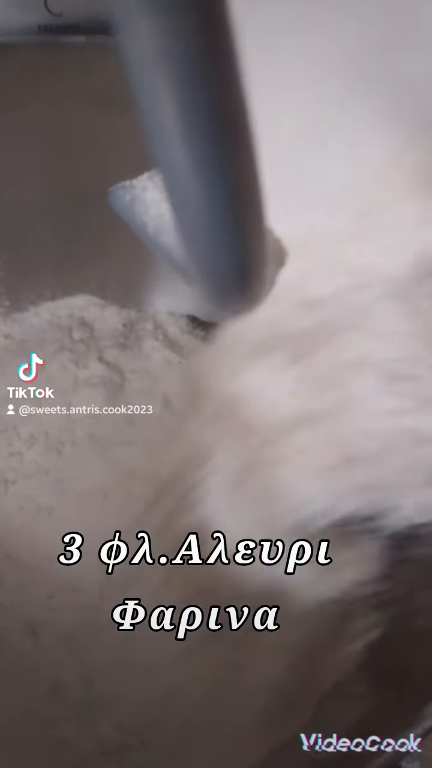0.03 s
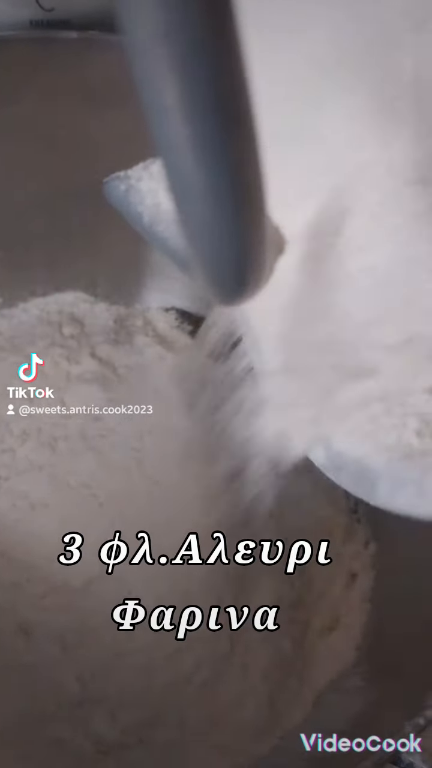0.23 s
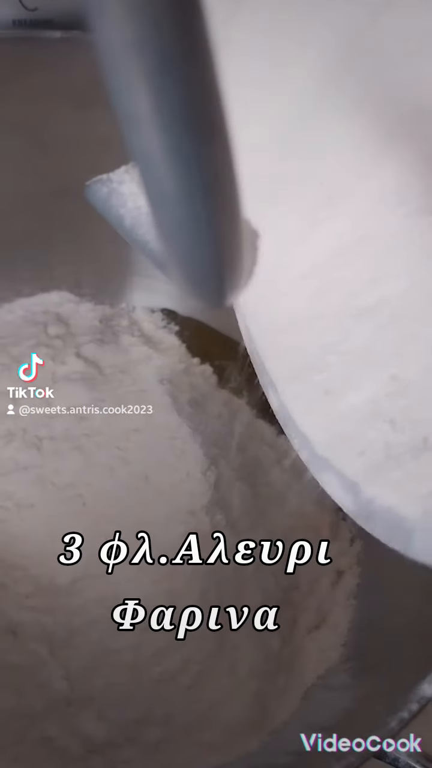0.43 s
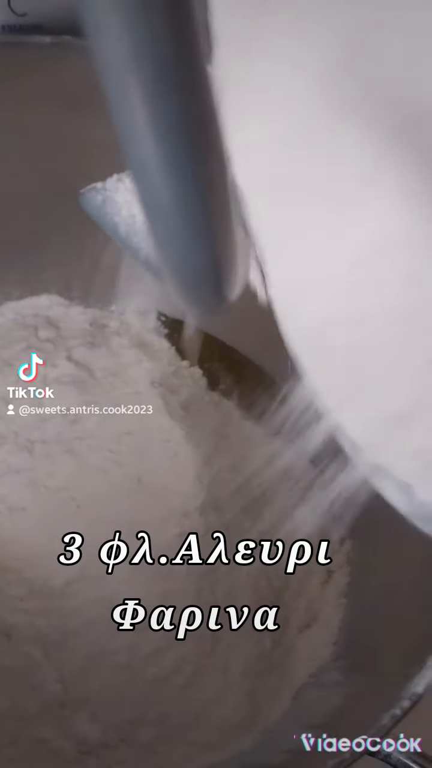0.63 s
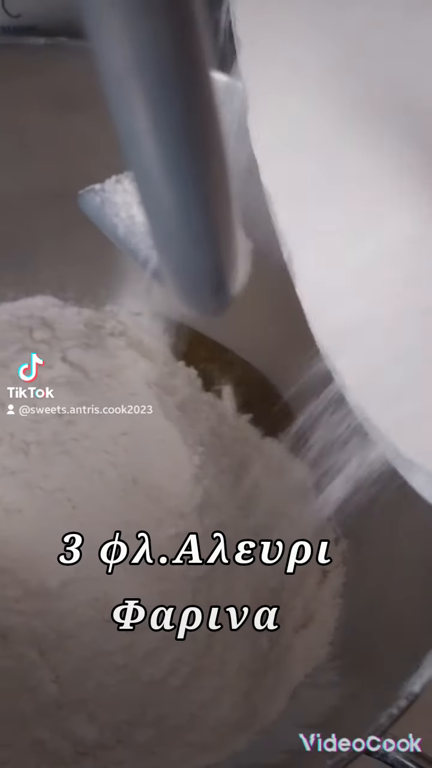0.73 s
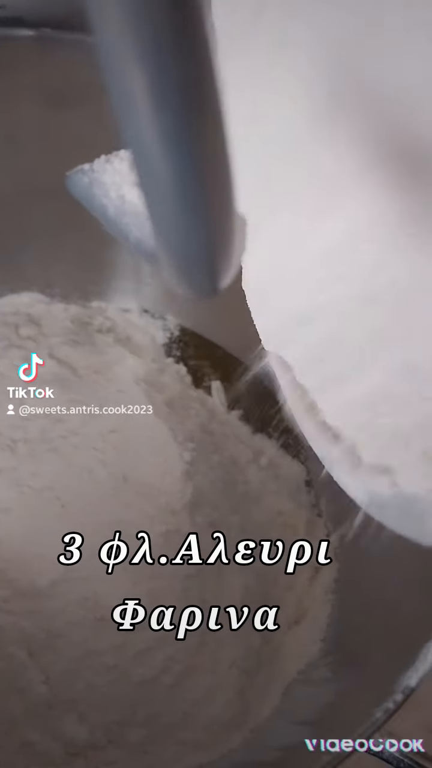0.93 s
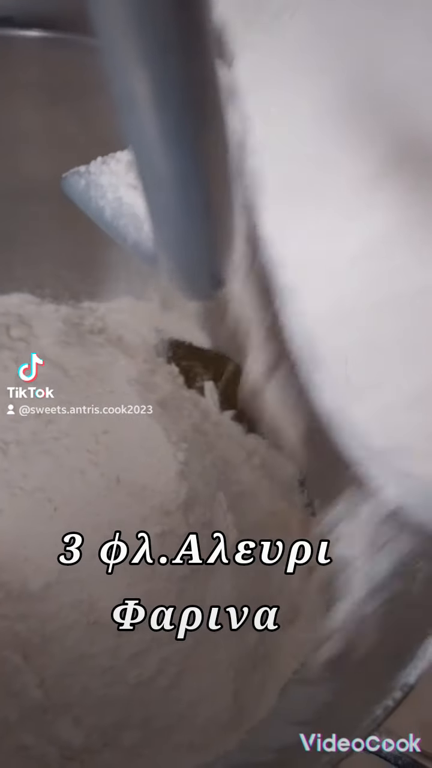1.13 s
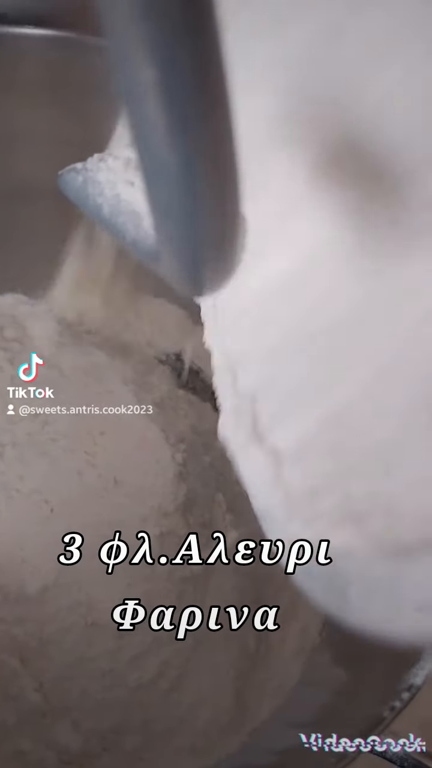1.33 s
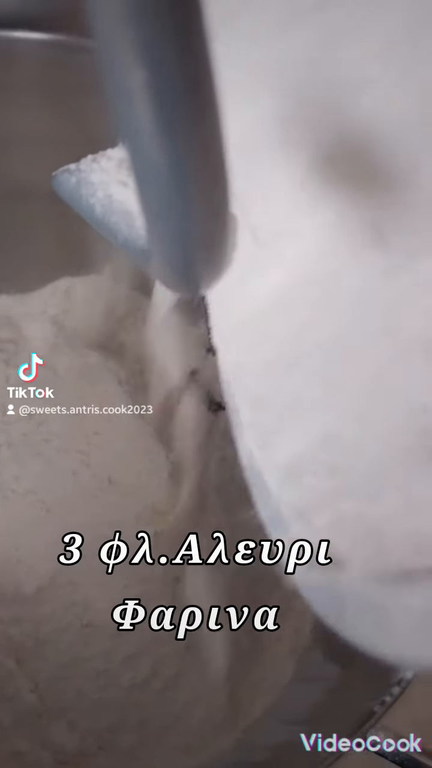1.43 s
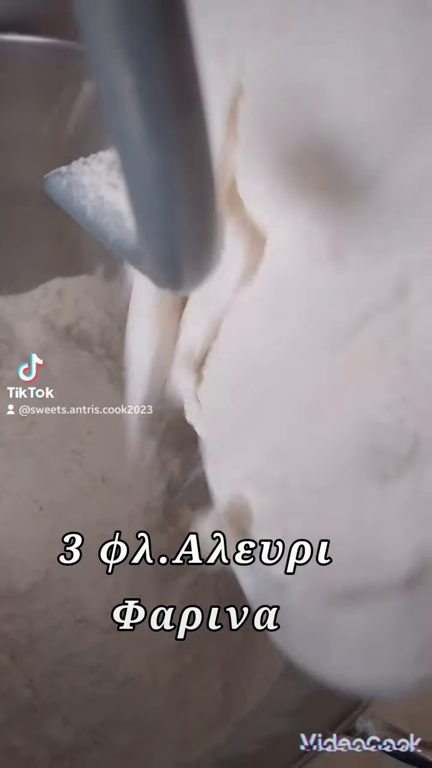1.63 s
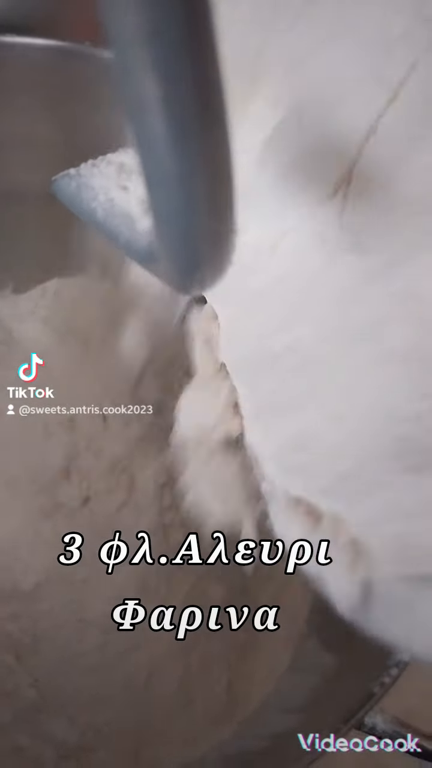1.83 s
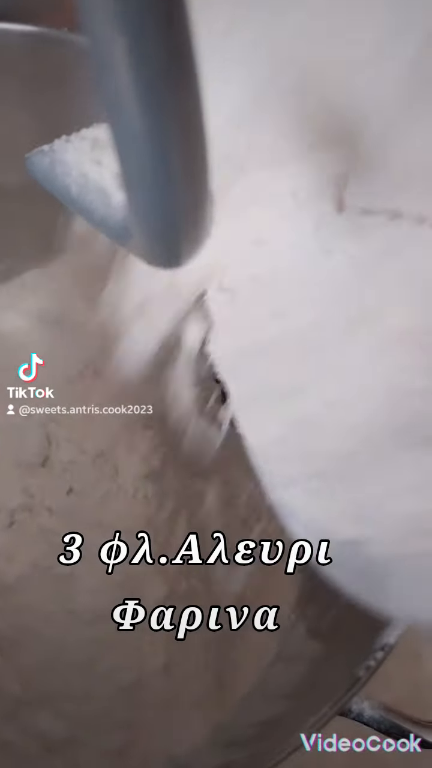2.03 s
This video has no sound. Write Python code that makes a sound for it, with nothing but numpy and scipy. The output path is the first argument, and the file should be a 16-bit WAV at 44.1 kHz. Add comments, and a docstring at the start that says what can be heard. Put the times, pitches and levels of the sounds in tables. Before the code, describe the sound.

A plastic container knocks close by against a metal mixing bowl. A sharp tap at 0.2 seconds leads into hollow knocks that fade by 0.7 seconds. More thudding taps land around 0.8, 1.15, 1.35 and 1.5 seconds, with a tiny knock near 2 seconds. Flour slides out in soft puffs between them, while very faint birdlike chirps sound over the quiet kitchen's low hum.

```python
"""A plastic container knocks against a metal mixing bowl as it is emptied, close by in a quiet kitchen.
Each impact excites damped modes: the flour-damped bowl answers with a hollow note and a tick, and taps
that loosen the rest draw a thud, a ring and a crack from the container. Flour slides out in soft puffs
of grainy noise. Faint falling chirps, like a distant bird, sound over the low room noise and hum."""
import sys
import numpy as np
from scipy import signal
from scipy.fft import rfft, irfft
from scipy.io import wavfile
from scipy.ndimage import uniform_filter1d

SR = 44100
rng = np.random.default_rng(int(sys.argv[2]) if len(sys.argv) > 2 else 0)


def dump_mix(stems):
    """Bounce the given channels to the path in sys.argv[1] as a 16-bit WAV at rate SR."""
    frames = np.atleast_2d(stems).T  # one column per channel
    limited = np.clip(frames, -1, 1)  # hard clip at full scale
    pcm = np.round(limited * 32767).astype(np.int16)
    wavfile.write(sys.argv[1], SR, pcm)


N = 92610
LEAD_S = 0.1  # lead-in, so that an earlier blow can still be ringing at time zero


def amp(db):
    """Amplitude ratio: a factor of ten per 20 dB."""
    return 10 ** (np.asarray(db) / 20)


def unit_rms(x):
    """Normalisation to unit mean power."""
    return x / np.sqrt(np.mean(x ** 2) + 1e-20)


def curve_at(points, hz):
    """Interpolation on a logarithmic frequency axis."""
    point_hz, value = np.transpose(points)
    return np.interp(np.log(hz + 1), np.log(point_hz + 1), value)


def track():
    """Stereo silence with a lead-in."""
    return np.zeros((2, N + round(LEAD_S * SR)))


def add(mix, start_s, sound):
    """Superposition: a sound sums into a track from its start time."""
    part = mix[..., max(round((start_s + LEAD_S) * SR), 0):][..., :sound.shape[-1]]
    part += sound[..., :part.shape[-1]]


def pan(pan_db):
    """Level difference between the channels: left exceeds right by pan_db."""
    return amp(np.array([[pan_db], [-pan_db]]) / 2)


def decay(t, t60_s):
    """Exponential damping: 60 dB of loss in t60_s."""
    return np.exp(-np.log(1000) * t / t60_s)


def ring(modes, rise_s, hold_s=0):
    """Modal vibration: damped cosines start together and decay after hold_s."""
    t = np.arange(SR // 2) / SR
    free_s = np.maximum(t - hold_s, 0)
    motion = sum(pan(pan_db) * amp(level_db) * decay(free_s, t60_s) * np.cos(2 * np.pi * pitch_hz * t)
                 for pitch_hz, level_db, t60_s, pan_db in modes)
    return -(1 - np.exp(-t / rise_s)) * motion


def strike(body, contact_ms, edge, lag_ms):
    """Impact as a low-pass: longer contact dulls the body, not the edge. Both reach the right late."""
    jw = 2j * np.pi * np.fft.rfftfreq(body.shape[1], 1000 / SR)  # radians per ms
    spectrum = rfft(body) / (1 + jw * contact_ms) ** 3 + rfft(edge)
    delay = np.array([np.ones_like(jw), np.exp(-jw * lag_ms)])
    return irfft(spectrum * delay)


# Left-right coherence of the room's sound field: frequency_hz, coherence
FIELD_COHERENCE = [(60, 0.84), (290, 1), (640, 0.19), (1400, 0), (15000, 0.078)]
# Left-right balance of diffuse noise: frequency_hz, pan_db
FIELD_BALANCE = [(60, -3.5), (200, 1), (380, -1.5), (750, -9), (1300, -4.5), (2400, 2.5), (15000, 3)]


def noise(spectrum, size, diffuse=False):
    """Spectrally shaped stereo noise; a diffuse field is coherent only at long wavelengths."""
    hz = np.fft.rfftfreq(size, 1 / SR)
    bins = rfft(rng.standard_normal((2, size))) * amp(curve_at(spectrum, hz))
    if diffuse:
        coherence = np.clip(curve_at(FIELD_COHERENCE, hz), -1, 1)
        balance = amp(curve_at(FIELD_BALANCE, hz) / 2)
        right = coherence * bins[0] + np.sqrt(1 - coherence ** 2) * bins[1]
        bins = np.array([bins[0] * balance, right / balance])
    return unit_rms(irfft(bins, size))


# Spectrum of the room's background noise: frequency_hz, level_db
ROOM_NOISE_SPECTRUM = [(20, -23.5), (42, -8.5), (63, -4.5), (100, -6), (200, -12), (400, -16.5), (680, -29),
                       (850, -12.5), (1000, -26), (1600, -24.5), (2500, -45.5), (4500, -38), (9000, -52.5),
                       (16000, -44.5)]


def room_noise(level_db=-64.5):
    """A steady diffuse field, strongest in the bass."""
    return amp(level_db) * noise(ROOM_NOISE_SPECTRUM, N, diffuse=True)


def hum(pitch_hz=68, width_hz=8.3, level_db=-67.5):
    """Narrow-band noise: neighbouring frequencies beat, so the room's hum wavers."""
    hz = np.fft.rfftfreq(N, 1 / SR)
    band = np.exp(-((hz - pitch_hz) / width_hz) ** 2)
    return amp(level_db) * unit_rms(irfft(rfft(rng.standard_normal(N)) * band, N))


def echoes(t60_s, gap_s=0):
    """Dense reflections: an impulse response of decaying noise with unit energy."""
    t = np.arange(SR // 2) / SR
    response = rng.standard_normal((2, len(t))) * decay(t, t60_s) * (t > gap_s)
    return response / np.linalg.norm(response, axis=1, keepdims=True)


# Reverberation of the kitchen: frequency_hz, t60_s, level_db
REVERB_BANDS = [(71, 0.2, 4), (170, 0.36, -10), (270, 0.32, -4.5), (403, 0.19, -10.5), (938, 0.58, -22),
                (2200, 0.16, -8.5), (5000, 0.5, -13.5), (7500, 0.39, -16), (10000, .44, -21),
                (15600, .36, -10)]


def kitchen(direct, early_db=-14, build_up_s=0.0079):
    """Reverberation: early reflections in the bowl, then a room tail with a decay time for each band."""
    hz, t, bins = signal.stft(rng.standard_normal((2, SR)), SR, nperseg=512)
    bands = np.array(REVERB_BANDS)
    t60_s = curve_at(bands[:, [0, 1]], hz)[:, None]
    level_db = curve_at(bands[:, [0, 2]], hz)[:, None]
    coherence = np.clip(curve_at(FIELD_COHERENCE, hz), -1, 1)[:, None]
    bins[1] = coherence * bins[0] + np.sqrt(1 - coherence ** 2) * bins[1]
    unit_energy_decay = decay(t, t60_s) * np.sqrt(2 * np.log(1000) / t60_s / SR)
    tail = signal.istft(bins * amp(level_db) * unit_energy_decay, SR, nperseg=512)[1][:, :SR]
    tail *= np.minimum(np.arange(SR) / SR / build_up_s, 1) ** 2
    early = amp(early_db) * echoes(t60_s=0.082, gap_s=0.007)
    return direct + sum(signal.fftconvolve(direct, response, axes=1)[:, :direct.shape[1]]
                        for response in (early, tail))


# Distant chirps: start_s, length_s, start_hz, end_hz, level_db
CHIRP_NOTES = [(.07, 0.13, 5380, 4910, -84), (0.219, 0.045, 3935, 3090, -70.5),
               (0.298, 0.066, 4650, 2890, -69.5), (0.429, .08, 3940, 3800, -76.5),
               (0.9, 0.09, 4160, 3336, -73.5), (0.998, 0.09, 4144, 3046, -73.5),
               (1.62, 0.083, 4450, 3150, -72.5), (1.719, 0.067, 4317, 2840, -71),
               (1.955, 0.049, 4460, 3560, -79)]


def chirps(warble_depth=0.045, warble_s=0.004, direct_gain=0.42):
    """Frequency modulation: falling tones with a random warble, blurred by reverberation."""
    out = track()
    for start_s, length_s, start_hz, end_hz, level_db in CHIRP_NOTES:
        progress = np.linspace(0, 1, round(length_s * SR))
        warble = unit_rms(uniform_filter1d(rng.standard_normal(SR), round(warble_s * SR)))
        glide_hz = start_hz + (end_hz - start_hz) * progress
        pitch_hz = glide_hz * (1 + warble_depth * warble[:len(progress)])
        envelope = np.sqrt(abs(np.sin(np.pi * progress)))
        tone = np.sin(2 * np.pi * np.cumsum(pitch_hz) / SR)
        add(out, start_s, amp(level_db) * unit_rms(envelope * tone))
    reverb = signal.fftconvolve(out, echoes(t60_s=0.38), axes=1)[:, :out.shape[1]]
    return direct_gain * out + reverb


# Envelope of the container's rustle: time_s, level_db
RUSTLE_ENVELOPE = [(0, -57), (.17, -63.5), (.3, -59), (.6, -60.5), (.85, -56.5), (1.05, -60.5),
                   (1.3, -59.5), (1.55, -60), (1.7, -67.5), (2.1, -70)]
# Spectrum of the rustle: frequency_hz, level_db
RUSTLE_SPECTRUM = [(35, -21.5), (100, -2.5), (230, -1), (420, -3.5), (700, -8), (1000, -5.5), (1600, -12.5),
                   (2500, -26), (7000, -34.5), (16000, -58.5)]


def rustle():
    """Amplitude modulation: the dull noise of the handled container swells and sinks."""
    level_db = np.interp(np.arange(N) / SR, *np.transpose(RUSTLE_ENVELOPE))
    return amp(level_db) * noise(RUSTLE_SPECTRUM, N, diffuse=True)


# Flour leaving the container: peak_s, half_length_s, level_db
FLOUR_PUFFS = [(.33, 0.031, -74.5), (.51, 0.08, -79.5), (.74, 0.051, -85), (.88, 0.041, -74.5),
               (1.12, 0.022, -75), (1.27, 0.038, -72), (1.43, 0.049, -76.5), (1.58, 0.041, -71.5),
               (1.75, 0.036, -77), (2.11, .04, -93)]
# Spectrum of sliding powder: frequency_hz, level_db
POWDER_SPECTRUM = [(1500, 1.5), (4000, -6), (7500, -2), (9000, -7.5), (13000, -4), (16000, -7.5)]


def flour(grain_depth=0.13):
    """Granular flow: hiss in bell-shaped puffs, roughened by a fast random flicker."""
    t = np.arange(N) / SR
    flow = sum(amp(level_db) * np.exp(-((t - peak_s) / half_length_s) ** 2 / 2)
               for peak_s, half_length_s, level_db in FLOUR_PUFFS)
    flicker = unit_rms(uniform_filter1d(rng.standard_normal(N), size=60))
    grains = unit_rms(np.exp(grain_depth * flicker))
    return flow * grains * noise(POWDER_SPECTRUM, N)


def centred(table, centre_hz, first_octave_db=2.28):
    """Band-pass weighting: levels fall with the square of the octaves from a centre."""
    return [(hz, db - first_octave_db * np.log2(hz / centre_hz) ** 2, *rest) for hz, db, *rest in table]


# Taps on the container: start_s, thud_db, thud_hz, ring_db, tilt_db_per_octave, contact_ms,
# crack_db, crack_hz, pan_db
CONTAINER_TAPS = [(-.028, -12.5, 225, -23, -2.5, 0.14, -33, 5070, 4.5),
                  (0.2057, -7, 401, -22, 2, 0.17, -50, 4500, 4.5),
                  (0.2138, -15, 496, -38.5, 1, 0.21, -51.5, 4850, 0),
                  (0.8147, -15.5, 415, -27, 4.5, 0.059, -31.5, 1200, 0.5),
                  (1.15, -12.5, 306, -31.5, 1.5, 0.052, -31.5, 7560, 4),
                  (1.3510, -14, 195, -20.5, 1, 0.2, -37, 4260, 7),
                  (1.4704, -14.5, 198, -21.5, 0.7, 0.18, -36.5, 4600, 5.5)]
# Modes of the container wall, plus two low room resonances that ring on after each tap:
# pitch_hz, level_db, t60_s, pan_db
WALL_AND_ROOM_MODES = [(119.5, -12.5, 0.11, -5.5), (223.9, -21.5, 0.34, -12.5), (279.4, -15.5, 0.43, -5),
                       (335.2, -5, 0.06, -8.5), (475.3, -7.5, 0.08, 5.5), (530, -13, 0.038, 9),
                       (768.6, 3, 0.058, 2.5), (810, -12, .045, 4.5), (935, -20.5, 0.047, 4),
                       (1204, 3.5, 0.019, -3.5), (1760, -14.5, 0.023, 7), (2610, -23.5, .035, 17)]
# Modes of the stiff rim: pitch_hz, level_db, t60_s, pan_db
RIM_RESONANCES = [(3500, -32.5, 0.01, 2.5), (4680, -17.5, 0.014, -4), (7590, -6, .03, 1.5),
                  (7270, -5, 0.013, 13.5), (7640, -26, .028, 5.5)]
# Spectrum of the plastic crack: frequency_hz, level_db
CRACK_SPECTRUM = [(600, 16), (1200, 3.5), (2250, -5.5), (2900, -2.5), (3700, -1), (5000, 0.5), (6700, -5.5),
                  (7800, -1.5), (9200, -8.5), (13000, -11.5), (16000, -22)]


def taps(pivot_hz=470, crack_hold_s=0.0025):
    """Impulse response: a thud pitched by where the tap lands, a crack, and wall, rim and room modes."""
    out, t = track(), np.arange(SR // 2) / SR
    crack_envelope = decay(np.maximum(t - crack_hold_s, 0), t60_s=0.015)
    for start_s, thud_db, thud_hz, ring_db, tilt, contact_ms, crack_db, crack_hz, pan_db in CONTAINER_TAPS:
        thud = ring([(thud_hz, thud_db, 0.023, 0)], rise_s=0.00034)  # one mode, t60 of 23 ms
        modes = [(hz, ring_db + db + tilt * np.log2(hz / pivot_hz), *rest)
                 for hz, db, *rest in WALL_AND_ROOM_MODES]
        body = pan(pan_db) * (thud + ring(modes, rise_s=0.00065))
        crack = noise(centred(CRACK_SPECTRUM, crack_hz), len(t)) * crack_envelope
        rim = ring(centred(RIM_RESONANCES, crack_hz), rise_s=0.0007)
        edge = amp(crack_db) * pan(4.5) * (crack + rim)
        add(out, start_s, strike(body, contact_ms, edge, lag_ms=0.5))
    return out


# Knocks of the container on the bowl: start_s, level_db, contact_ms, tick_db
BOWL_KNOCKS = [(0.2899, -23.5, 0.28, -56.5), (0.4238, -21.5, 0.08, -42), (0.5567, -29, 0.15, -49),
               (0.671, -44, 0.25, -61.5), (1.966, -51, 0.13, -74.5)]
# Modes of container and bowl in contact: pitch_hz, level_db, t60_s, pan_db
BOWL_RESONANCES = [(104, -24.5, 0.3, 1), (222, -7.5, 0.045, -2.5), (422.5, 0, 0.054, -1),
                   (686, 0.5, 0.047, 0), (974, 1, 0.037, -5.5), (1667, -15, 0.11, 17.5),
                   (2070, -20, 0.015, -14), (218.2, -33, 0.87, -3.5)]
# Spectrum of the metal tick: frequency_hz, level_db
TICK_SPECTRUM = [(1500, 19), (2700, -6), (4000, -10.5), (5900, 3), (6600, -9), (7400, 5.5), (8800, -13),
                 (16000, -18)]


def knocks():
    """Impact excitation: container and bowl ring together in a hollow note, with a faint metal tick."""
    out, t = track(), np.arange(SR // 2) / SR
    note = ring(BOWL_RESONANCES, rise_s=0.0006, hold_s=0.004)
    for start_s, level_db, contact_ms, tick_db in BOWL_KNOCKS:
        tick = amp(tick_db) * noise(TICK_SPECTRUM, len(t)) * decay(t, t60_s=0.07)
        add(out, start_s, strike(amp(level_db) * note, contact_ms, tick, lag_ms=0.27))
    return out


def scene(low_cut_hz=81):
    """Superposition: reverberant blows, thinned by a microphone-style low cut, over quieter sources."""
    low_cut = signal.butter(2, low_cut_hz, "highpass", fs=SR, output="sos")
    blows = signal.sosfilt(low_cut, knocks() + taps())
    events = (kitchen(blows) + chirps())[:, -N:]  # drop the lead-in
    return events + flour() + rustle() + hum() + room_noise()


def record(dry, cutoff_hz=16200):
    """Band limiting: a linear-phase low-pass removes the highest treble."""
    low_pass = signal.firwin(511, cutoff_hz, window=("kaiser", 9), fs=SR)
    return signal.oaconvolve(dry, low_pass[None], "same")


dry = scene()
out = record(dry)
dump_mix(out)
```